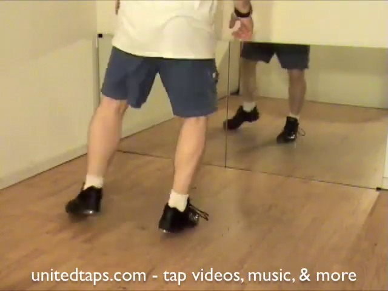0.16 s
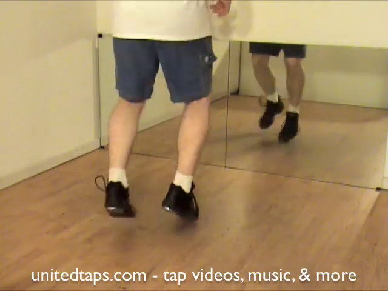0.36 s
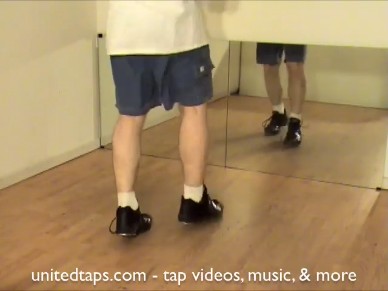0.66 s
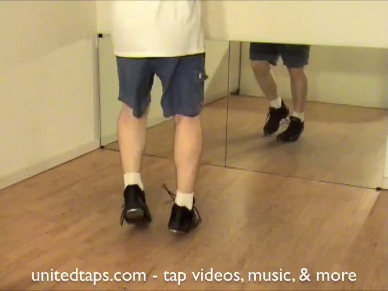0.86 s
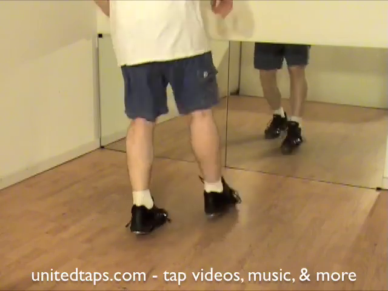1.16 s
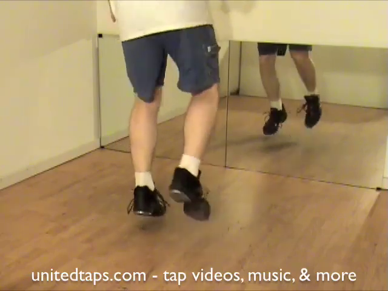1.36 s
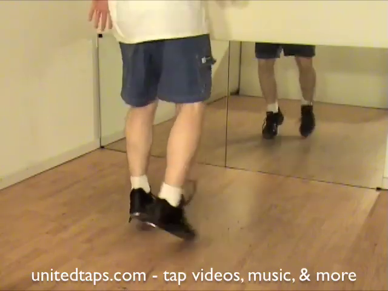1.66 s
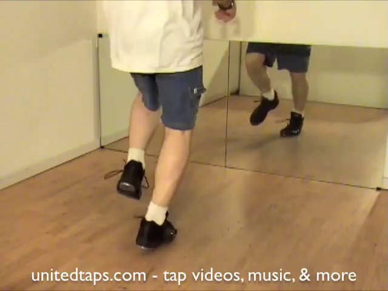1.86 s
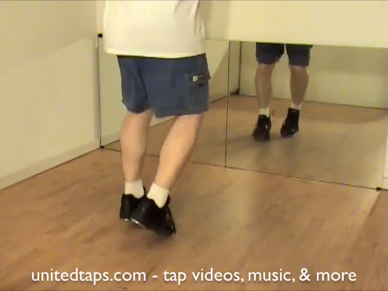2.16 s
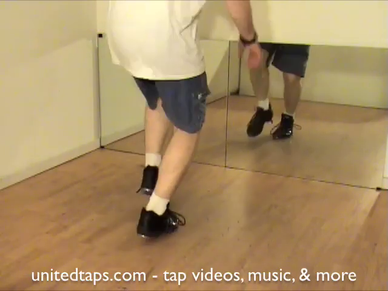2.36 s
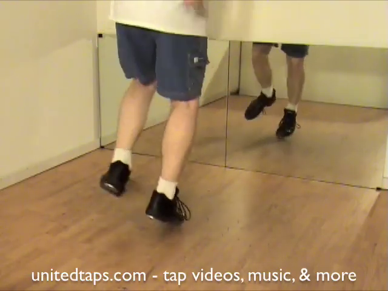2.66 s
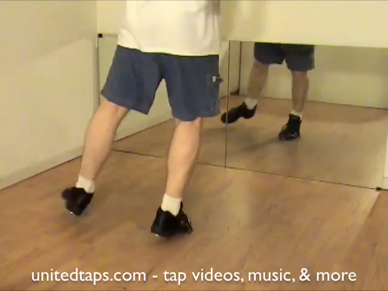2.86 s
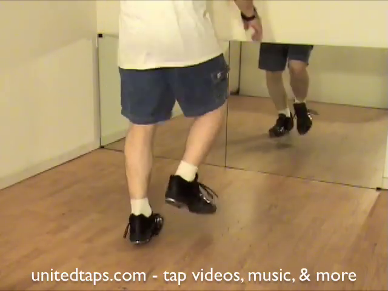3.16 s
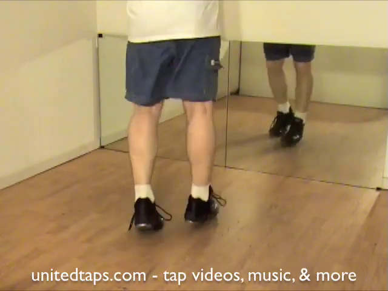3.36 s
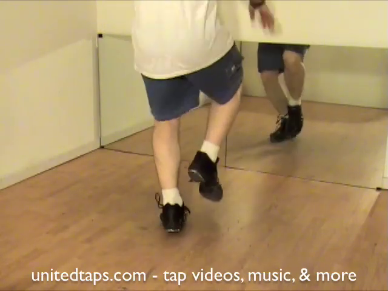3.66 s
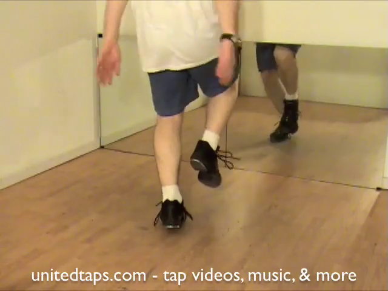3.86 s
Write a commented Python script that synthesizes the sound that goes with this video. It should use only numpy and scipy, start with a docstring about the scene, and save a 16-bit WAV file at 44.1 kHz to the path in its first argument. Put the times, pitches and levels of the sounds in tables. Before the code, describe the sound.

Tap shoes strike a wooden floor in steady, crisp clicks inside a bare, echoing studio.

```python
"""The ring of a tap already struck is heard first; then tap shoes step and shuffle on a wooden floor.
Each blow is a sharp click and its close reflection, filtered by broad resonances of floor, sole and plate.
Decaying sines ring floor and plate; shaped noise and discrete echoes make the bare, mirrored studio corner.
Some blows add a graze or a ping; a faint low rush lies beneath, and a small microphone rounds off the peaks."""
import sys
import numpy as np
from scipy import signal
from scipy.fft import rfft, irfft
from scipy.io import wavfile

SR = 44100
rng = np.random.default_rng(int(sys.argv[2]) if len(sys.argv) > 2 else 0)


def store_pcm(level_fs):
    """Save levels as 16-bit WAV."""
    pcm = np.round(np.clip(level_fs, -1, 1) * 32767).astype(np.int16)
    wavfile.write(sys.argv[1], SR, np.atleast_2d(pcm).T)


N = 176400  # samples in the scene
SIZE = 4096  # samples in the transform behind each spectrum
HZ = np.maximum(np.fft.rfftfreq(SIZE, 1 / SR), 1)


# The blows of the shoes: t/s, click level/dB, close echo delay t/s, close echo level/dB,
# six resonance levels/dB (thump, boards, sole, clack, plate, plate top),
# four resonance centres f/Hz (sole, clack, plate, plate top),
# low and middle hollow depth level/dB, middle hollow f/Hz, high hollow depth level/dB, high hollow f/Hz
TAPS = [(-0.035, -4, 0.003, -8, -3, 29, 25, 17, 21.5, 14.5, 820, 1880, 3330, 5760, 3.5, 2060, 4, 6310),
        (0.0843, -5.5, 0.0035, -6, -10, 14, 25.5, 26, 23, 15, 613, 1700, 4120, 6950, 4, 2600, 5, 6180),
        (0.182, -2, 0.0024, -9, -25, 26.5, 31, 23, 20.5, 7, 794, 1310, 4210, 6960, 0, 2450, 3, 4400),
        (0.319, -6.5, 0.0024, -7.5, -5, 20, 32.5, 18.5, 18.5, 16, 784, 2000, 3940, 5840, 2.5, 2140, 3, 6800),
        (0.4383, -4, 0.0028, -5, -25, 31.5, 31, 16, 15.5, 9, 777, 2600, 4310, 6710, 6, 2310, 0, 5300),
        (0.6476, -2, 0.0028, -13, 2, 19, 14, 21, 20.5, 15.5, 580, 1300, 4300, 5860, 6.5, 2360, 5, 5220),
        (0.788, -2.5, 0.004, -8.5, -9, 16, 22.5, 16.5, 18.5, 12.5, 790, 1840, 3950, 6400, -0.5, 2170, 14, 5230),
        (0.982, -3, 0.0035, -9, -5, 27, 25, 17.5, 17, 16.5, 730, 1350, 3420, 5870, -0.5, 2450, 4, 6160),
        (1.1196, -8, 0.0028, -5, -18, 21.5, 18, 22, 13.5, -1, 570, 1500, 3900, 7150, 4, 2470, 2.5, 4710),
        (1.2729, -8, 0.0032, -4, -14, 20, 17.5, 23, 22.5, 11, 560, 1480, 4060, 7220, 3.5, 2520, 8.5, 4560),
        (1.4148, -5.5, 0.0028, -6.5, -8, 28, 25, 19, 16, 16.5, 685, 1260, 3400, 5930, 0, 2450, 3, 6260),
        (1.528, -5, 0.005, -8, -22, 25, 26.5, 24, 21.5, 12.5, 720, 1730, 3900, 6550, 6, 2620, 4, 7000),
        (1.6576, -2, 0.0057, -17, -2, 16.5, 20.5, 25, 23.5, 16, 920, 1520, 3360, 6000, 9, 2530, 1, 5340),
        (1.772, -4, 0.004, -6.5, -25, 20.5, 24.5, 26.5, 21.5, 14, 637, 1650, 3950, 6300, 4.5, 2580, 4, 6300),
        (1.9635, -6, 0.0032, -5.5, -23, 28.5, 28, 20, 18, 11.5, 716, 1380, 3470, 5600, 0.5, 2450, 4, 6000),
        (2.1043, -2.5, 0.0034, -5, 2, 28.5, 30.5, 25.5, 23, 15.5, 850, 2260, 4150, 6600, 3, 2140, 1, 5430),
        (2.2805, -5.5, 0.0042, -3, -12, 13.5, 17.5, 26, 21.5, 11, 624, 1650, 3700, 6090, 6, 2890, 1, 6650),
        (2.4264, -2, 0.0034, -6, -17, 27, 24, 18.5, 19.5, 13, 690, 1390, 3350, 5800, 2, 2450, 3, 6170),
        (2.5692, -6, 0.0033, -4.5, -8, 28.5, 27, 19, 18, 8, 814, 2480, 4400, 6340, 5.5, 2310, 7, 4840),
        (2.725, -8, 0.0037, 0, -13, 3, 22, 24.5, 19, 7.5, 660, 1560, 4320, 7360, 4.5, 2350, 5, 6130),
        (2.8362, -4, 0.0028, -8, -17, 26, 30, 12, 15.5, 10.5, 860, 2210, 4080, 6350, 2, 2290, 1, 6600),
        (2.954, -4.5, 0.0028, -6, -27, 18, 27.5, 16, 17, 14, 810, 1660, 3450, 5250, 0, 2450, 1, 5730),
        (3.0721, -5.5, 0.0035, -4.5, -25, 28, 24, 22, 14.5, 11.5, 685, 1170, 3960, 6300, -0.5, 2450, 6, 6650),
        (3.2627, -4, 0.0038, -5, -26, 15.5, 16, 21, 20, 10, 890, 1360, 3640, 5940, 7, 2310, 0, 6350),
        (3.4077, 2.5, 0.0043, -2, -6, 16.5, 23.5, 20.5, 18, 14, 660, 1860, 4080, 7000, -0.5, 2450, 3, 5960),
        (3.5871, -4, 0.0038, -1.5, 4, 26.5, 28, 15, 16.5, 16.5, 846, 1830, 4200, 5800, 5.5, 2260, 1, 6500)]


def dance(mix):
    """Superposition: successive blows add linearly, each with its own excitation and resonances."""
    for start_s, *blow in TAPS:
        add(mix, start_s, tap(*blow))


THUMP_HZ, BOARDS_HZ = 126, 452


def tap(click_db, echo_delay_s, echo_db, thump_db, boards_db, sole_db, clack_db, plate_db, top_db,
        sole_hz, clack_hz, plate_hz, top_hz, *hollows):
    """Source and filter: click, close echo, ringing and room pass through the spectrum of the blow."""
    t = np.arange(SR) / SR
    levels_db = (thump_db, boards_db, sole_db, clack_db, plate_db, top_db)
    centres_hz = (THUMP_HZ, BOARDS_HZ, sole_hz, clack_hz, plate_hz, top_hz)
    colour = shoe(levels_db, centres_hz, *hollows)
    paths = studio(t) + floor_ring(t) + plate_body(t)
    add(paths, 0, click_and_close_echo(click_db, echo_delay_s, echo_db))
    return signal.fftconvolve(paths, pulse(colour))


# Quality factor Q of thump, boards, sole, clack, plate, plate top [no unit]
SHARPNESS = [1.9, 1.62, 1.42, 1.38, 1.7, 1.9]
# Widths of the low, middle and high hollows, centre to 1/e of the depth in dB: f/Hz
HOLLOW_WIDTHS_HZ = [187, 250, 390]
LOW_HOLLOW_HZ = 852


def shoe(levels_db, centres_hz, hollow_db, middle_hz, high_db, high_hz):
    """Resonance: broad peaks of floor, sole and plate; light toe blows leave gaps between them."""
    power = 0
    for db, hz, q in zip(levels_db, centres_hz, SHARPNESS):
        detuning = HZ / hz - hz / HZ
        power = power + (amp(db) / (1 + (q * detuning) ** 2)) ** 2
    depths_db = (hollow_db, hollow_db, high_db)
    hollow_centres_hz = (LOW_HOLLOW_HZ, middle_hz, high_hz)
    loss_db = 0
    for db, hz, width in zip(depths_db, hollow_centres_hz, HOLLOW_WIDTHS_HZ):
        loss_db = loss_db + db * np.exp(-((HZ - hz) / width) ** 2)
    return np.sqrt(power) * amp(-loss_db)


# Colour shared by the click and its close echo: f/Hz, level/dB
DIRECT = [(60, 8.5), (150, 4), (400, -2), (900, -7), (2000, -1.5), (4000, 3), (8000, 2)]


def click_and_close_echo(click_db, echo_delay_s, echo_db):
    """Direct sound and early reflection: a sharp click, then its close return from floor or mirror."""
    arrivals = np.zeros(SIZE)
    add(arrivals, 0, amp(click_db) * contact())
    add(arrivals, echo_delay_s, amp(echo_db) * contact())
    return signal.fftconvolve(arrivals, pulse(amp(read(DIRECT, HZ))))


CHATTER_S, CHATTER_DB = 0.00095, -4  # amplitude decay time; level against the click


def contact():
    """Impulsive excitation: a sharp click, then a tiny noise rattle as the plate settles on the wood."""
    t = np.arange(256) / SR
    hit = amp(CHATTER_DB) * unit(rng.standard_normal(len(t)) * np.exp(-t / CHATTER_S))
    hit[0] -= 1  # the click is one sample long
    return unit(hit)


# Modes of the metal plate, before the colour of the blow: f/Hz, level/dB, decay by 60 dB t/s
PLATE_MODES = [(3280, -61, 0.062), (3720, -55, .05), (4290, -43, 0.07), (4880, -42, 0.063)]


def plate_body(t):
    """Modal vibration: the plate rings briefly at a few natural frequencies."""
    return ring(PLATE_MODES, t)


# Modes of the floor, before the colour of the blow: f/Hz, level/dB, decay by 60 dB t/s
FLOOR_MODES = [(230.3, -58, 0.45), (270.7, -56.5, 0.56), (321, -57, 0.56), (389, -63, 0.55),
               (434, -58.5, 0.58), (469.6, -62, .45), (507.3, -59.5, 0.49), (567, -60, 0.53),
               (666, -62.5, 0.56), (1052, -64, 0.5)]


def floor_ring(t):
    """Modal vibration: the floor rings under every step."""
    return ring(FLOOR_MODES, t)


def ring(modes, t):
    """Free decay: a sum of exponentially dying sines, with very slightly varied strengths."""
    total = 0
    for hz, db, t60 in modes:
        strength = rng.uniform(0.92, 0.93)
        total = total + strength * amp(db - 60 * t / t60) * np.sin(2 * np.pi * hz * t)
    return total


# Pings of the plate into the room on some blows: t/s, f/Hz, level/dB before the room
RINGS = [(.0845, 4900, -7), (.182, 2880, -3), (.648, 4450, -6), (.788, 4220, -1), (1.6575, 3650, 0),
         (1.772, 3700, -8), (2.725, 4900, -6), (3.408, 7550, -3)]
RING_T60 = 0.017  # s


def plate_rings(mix):
    """Free decay in a reverberant space: brief metallic pings are held by the room."""
    t = np.arange(SR) / SR
    for start_s, hz, db in RINGS:
        ping = unit(np.sin(2 * np.pi * hz * t) * amp(-60 * t / RING_T60))
        add(mix, start_s, amp(db) * signal.fftconvolve(ping, studio(t)))


# Grazes of the plate on the floor just before some blows: t/s, level/dB
GRAZES = [(0.7843, 4), (3.4036, 1)]
# Colour of metal brushing wood: f/Hz, level/dB
GRAZE_COLOUR = [(100, -22), (700, 0), (1600, 3), (2500, 1), (4200, -2), (7500, -5), (10000, -10)]
GRAZE_S = .002  # amplitude decay time


def grazes(mix):
    """Friction noise: a few milliseconds of metal brushing wood, as filtered, decaying noise."""
    t = np.arange(SIZE) / SR
    for start_s, db in GRAZES:
        scrape = rng.standard_normal(SIZE) * np.exp(-t / GRAZE_S)
        coloured = signal.fftconvolve(scrape, pulse(amp(read(GRAZE_COLOUR, HZ))))
        add(mix, start_s, amp(db) * unit(coloured))


EARLY_DB, EARLY_S = -13.5, 0.007  # early scatter: level, energy decay time
ROOM_DB, ROOM_START_S, ROOM_RISE_S = 0, 0.0022, .003


def studio(t):
    """Room impulse response: early scatter, a long tail and discrete reflections at one floor spot."""
    rise = np.clip((t - ROOM_START_S) / ROOM_RISE_S, 0, 1)
    early = rng.standard_normal(len(t)) * rise * np.exp(-t / (2 * EARLY_S))
    room = amp(ROOM_DB) * late_tail(t) * rise + amp(EARLY_DB) * unit(early)
    wall_echoes(room)
    return room


# Reverberation time of the studio: f/Hz, decay by 60 dB t/s
ROOM_T60 = [(100, 0.52), (300, 0.81), (700, 0.67), (1400, 0.79), (2300, 0.77), (4200, 0.83), (7000, 0.74),
            (10000, 0.52)]
LOW_ROOM_HZ, LOW_RISE_S, LOW_ROOM_DB = 650, 0.02, -1.1


def late_tail(t):
    """Reverberation: diffuse noise decays at a rate set by frequency; its low end builds up more slowly."""
    hz, when, z = signal.stft(rng.standard_normal(len(t)), SR, nperseg=256)
    t60 = read(ROOM_T60, hz)[:, None]
    low = 1 / (1 + (hz[:, None] / LOW_ROOM_HZ) ** 4)  # share of the low end
    build = 1 - low + low * amp(LOW_ROOM_DB) * np.minimum(when / LOW_RISE_S, 1)
    # equal energy for every decay time, before the build-up
    level = np.sqrt(np.log(10 ** 6) / (t60 * SR))
    decaying = z * build * amp(-60 * when / t60) * level
    return signal.istft(decaying, SR, nperseg=256)[1][:len(t)]


# Click reflections from near walls and mirror: mean delay t/s, level/dB
ECHOES = [(.0074, -15.5), (.0098, -18), (.0118, -15), (.0146, -18.5), (0.02, -30), (.047, -34.5)]
# Stronger wall reflections of the boards' knock: mean delay t/s, level/dB
KNOCK_ECHOES = [(.0098, -7.5), (.0445, -11)]
# Colour of the returned knock: f/Hz, level/dB
KNOCK_COLOUR = [(100, -9), (300, -4), (550, 0.5), (900, -0.5), (1500, -11), (3000, -26.5)]
ECHO_SPREAD_S = .0006  # standard deviation: the feet move between taps


def wall_echoes(room):
    """Specular reflection: near walls and mirror return delayed clicks and knocks."""
    for delay_s, db in ECHOES:
        add(room, delay_s + ECHO_SPREAD_S * rng.standard_normal(), amp(db) * contact())
    knock = pulse(amp(read(KNOCK_COLOUR, HZ)))
    for delay_s, db in KNOCK_ECHOES:
        add(room, delay_s + ECHO_SPREAD_S * rng.standard_normal(), amp(db) * knock)


# Spectral shape of the still room: f/Hz, relative level/dB per Hz
HUM = [(20, 5), (60, -5.5), (200, -23.5), (1000, -5), (8000, -35)]
HUM_DB = -50.5  # RMS level before the microphone


def still_room():
    """Stationary background noise: a faint low rush, shaped in the frequency domain."""
    spectrum = rfft(rng.standard_normal(N))
    noise = irfft(spectrum * amp(read(HUM, np.fft.rfftfreq(N, 1 / SR))), N)
    return amp(HUM_DB) * unit(noise) * np.sqrt(N)


def amp(db):
    """Logarithmic level: converts decibels to amplitude gain."""
    return 10 ** (np.asarray(db) / 20)


def read(points, hz):
    """Interpolation: reads a curve along a logarithmic frequency axis."""
    f, value = np.transpose(points)
    return np.interp(np.log(hz + 1), np.log(f), value)  # +1 avoids log(0)


def unit(x):
    """Energy normalization: scales the sum of squares to one."""
    return x / (np.linalg.norm(x) + 1e-12)


def add(mix, start_s, sound):
    """Superposition: adds a sound in place at its start, dropping what falls outside."""
    at = round(start_s * SR)
    sound = sound[max(-at, 0):]
    part = mix[max(at, 0):][:len(sound)]
    part += sound[:len(part)]


def pulse(gain):
    """Minimum phase: the most compact causal pulse with this magnitude spectrum."""
    both_sides = np.r_[gain, gain[-2:0:-1]]
    log_gain = np.log(np.maximum(both_sides, 1e-5))
    return irfft(np.exp(np.conj(signal.hilbert(log_gain)))[:len(gain)])


def scene():
    """Superposition: taps, grazes and pings over the still room."""
    mix = still_room()
    dance(mix)
    grazes(mix)
    plate_rings(mix)
    return mix[None]


# Microphone colour: f/Hz, level/dB
MIC = [(30, -7.5), (100, -2), (200, 1), (320, -1.5), (600, 0.5), (1100, -0.5), (2000, -1), (2600, -0.5),
       (3300, -1), (5500, 0.5), (7500, -1.5), (9000, -3.5), (10200, -9.5), (11200, -24), (12200, -34)]
CEILING = 0.67  # amplitude that the rounded peaks approach
EDGE_HZ = 12300


def record(dry):
    """Transduction: soft overload of the peaks, then microphone colour and the band limit."""
    rounded = dry / (1 + (dry / CEILING) ** 4) ** .25
    coloured = signal.fftconvolve(rounded, pulse(amp(read(MIC, HZ)))[None])[:, :N]
    low_pass = signal.firwin(511, EDGE_HZ, window=("kaiser", 9), fs=SR)
    return signal.oaconvolve(coloured, low_pass[None], "same")


dry = scene()
out = record(dry)
store_pcm(out)
```